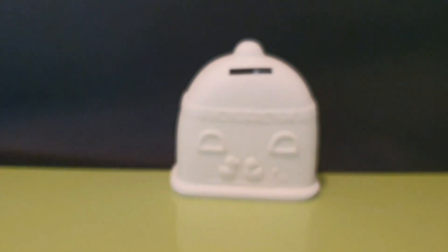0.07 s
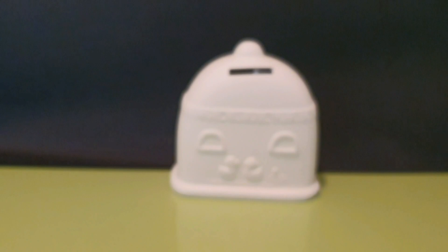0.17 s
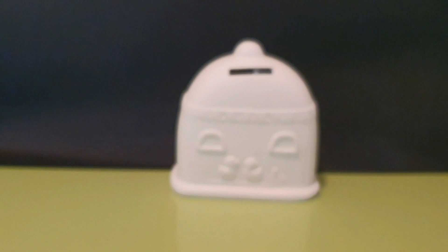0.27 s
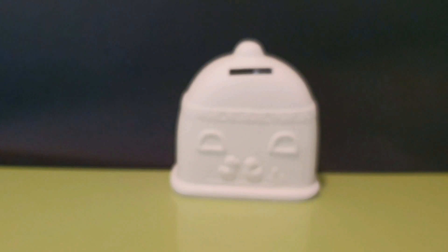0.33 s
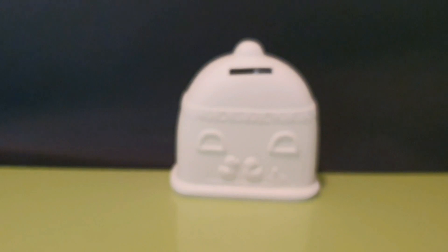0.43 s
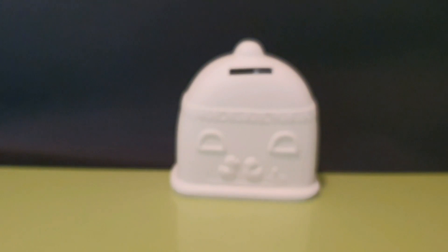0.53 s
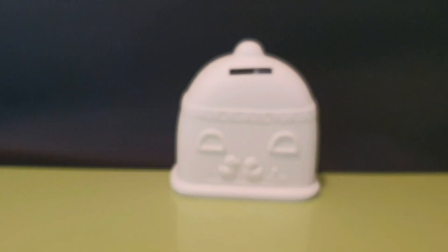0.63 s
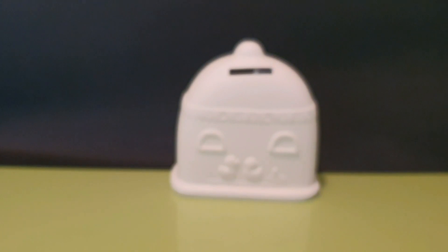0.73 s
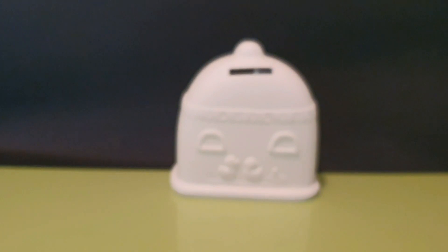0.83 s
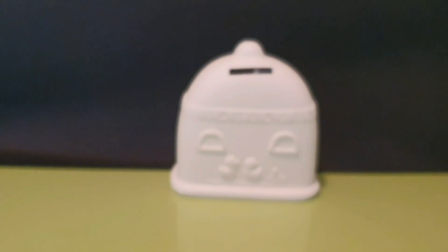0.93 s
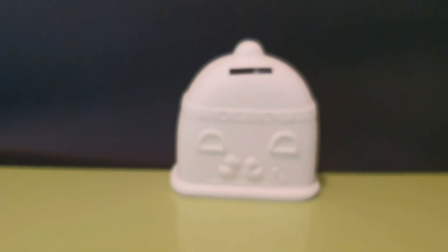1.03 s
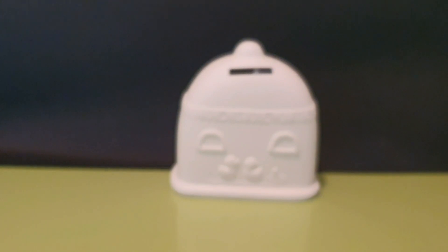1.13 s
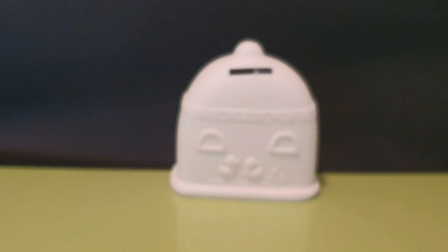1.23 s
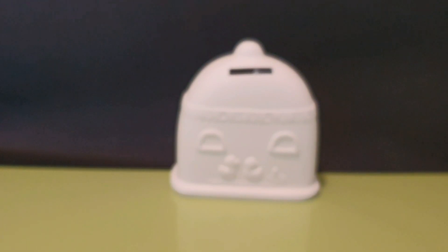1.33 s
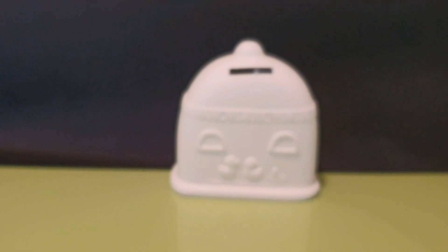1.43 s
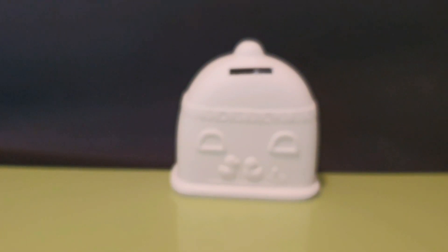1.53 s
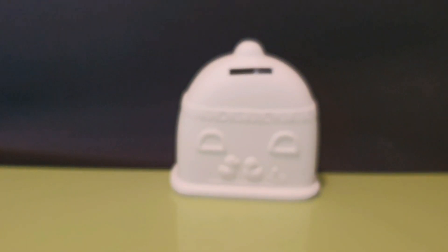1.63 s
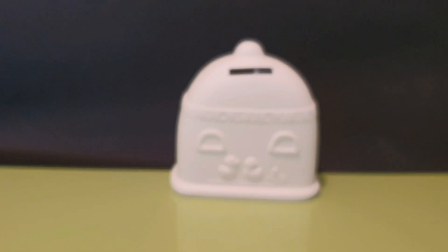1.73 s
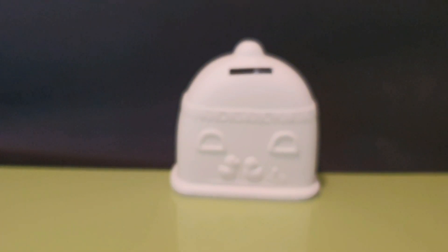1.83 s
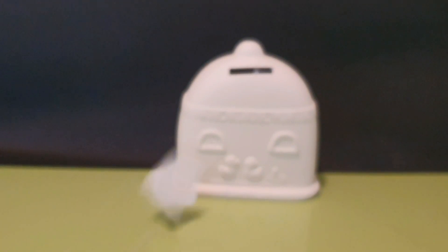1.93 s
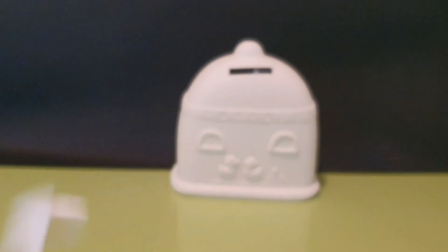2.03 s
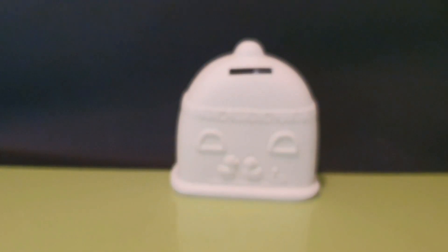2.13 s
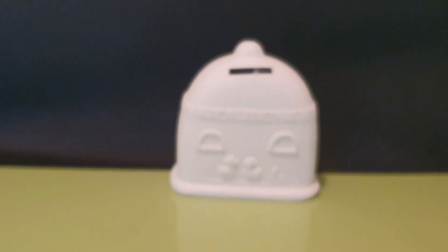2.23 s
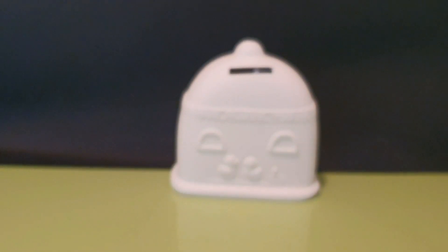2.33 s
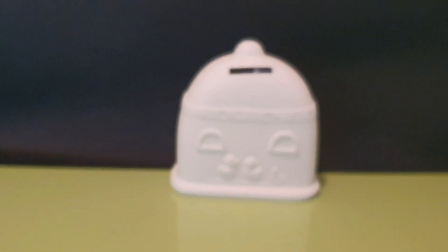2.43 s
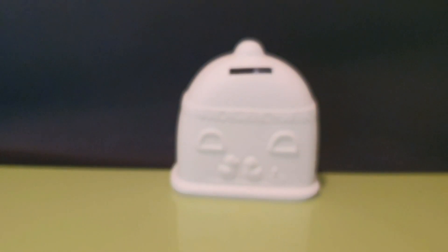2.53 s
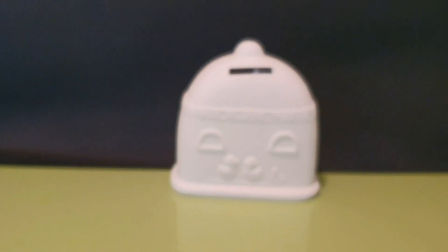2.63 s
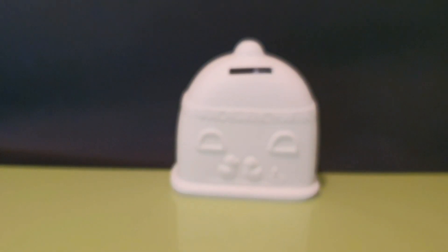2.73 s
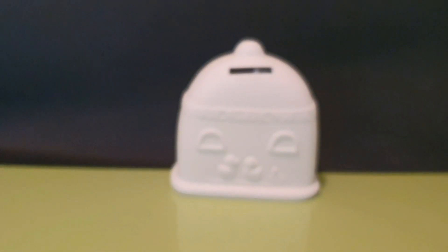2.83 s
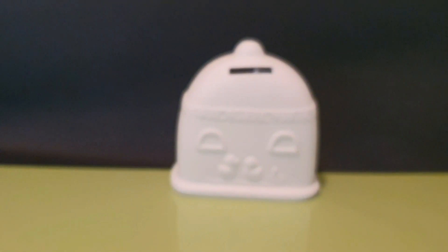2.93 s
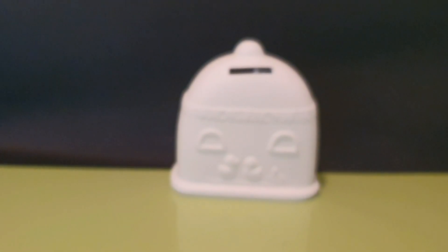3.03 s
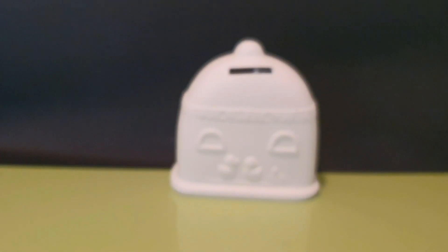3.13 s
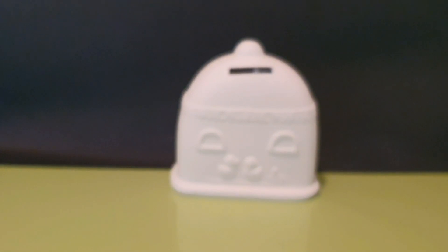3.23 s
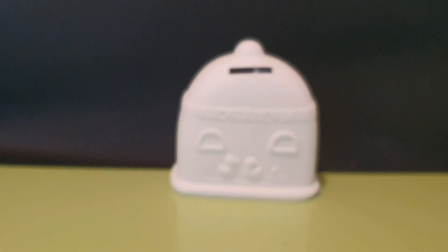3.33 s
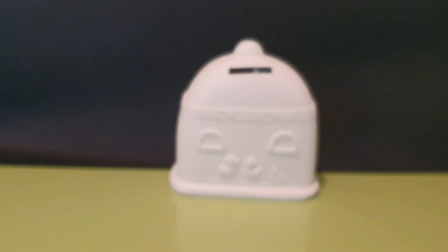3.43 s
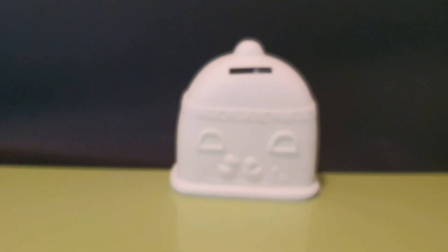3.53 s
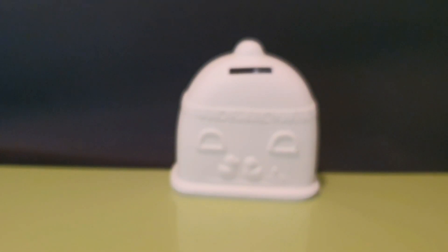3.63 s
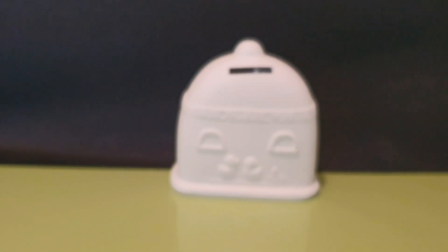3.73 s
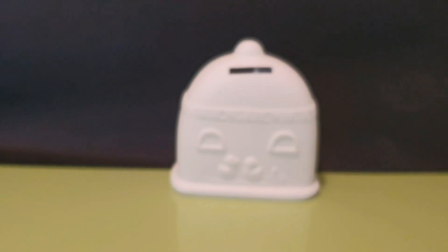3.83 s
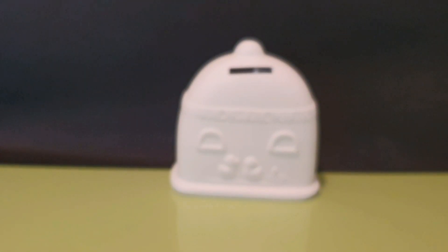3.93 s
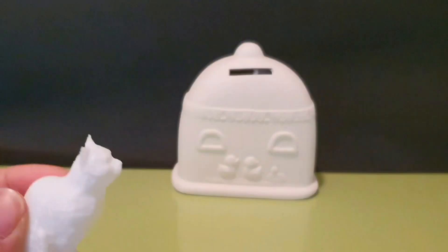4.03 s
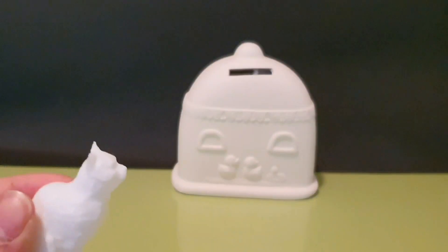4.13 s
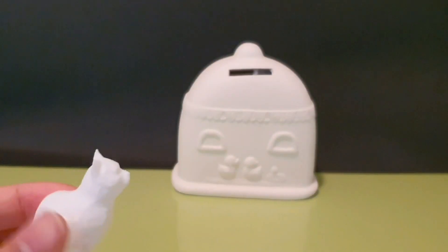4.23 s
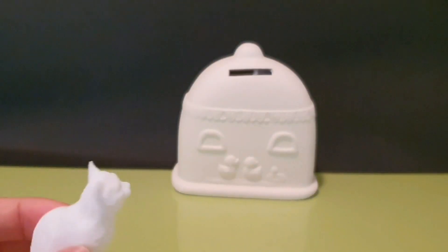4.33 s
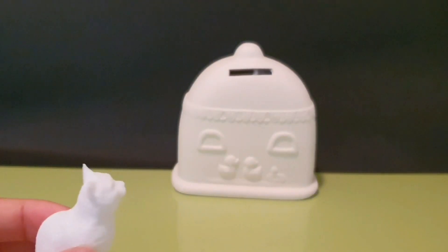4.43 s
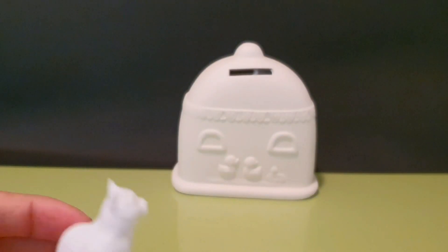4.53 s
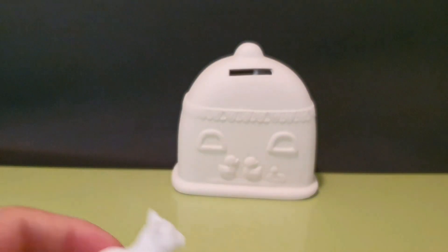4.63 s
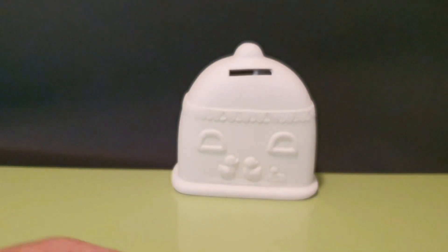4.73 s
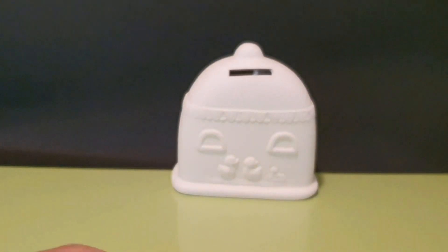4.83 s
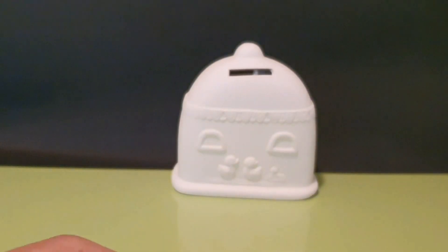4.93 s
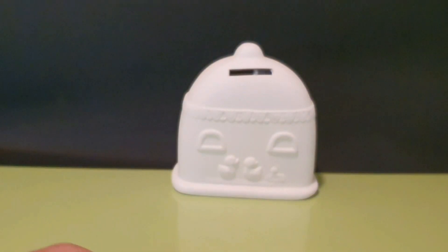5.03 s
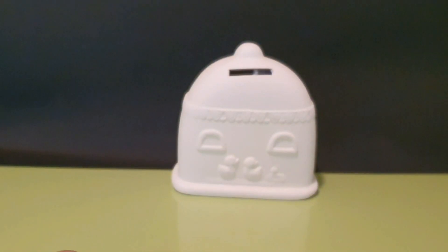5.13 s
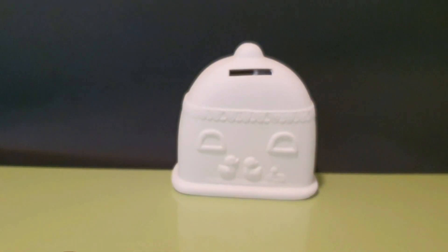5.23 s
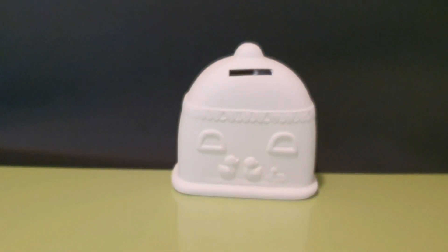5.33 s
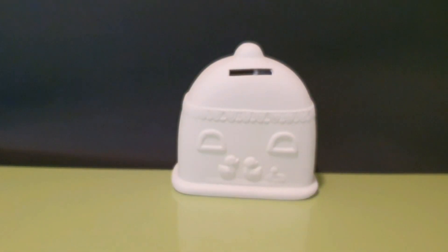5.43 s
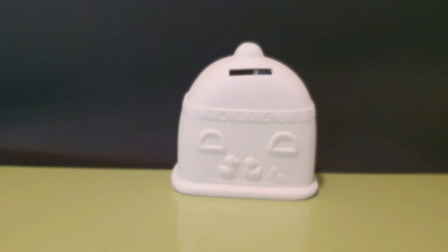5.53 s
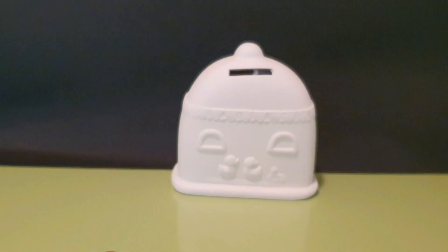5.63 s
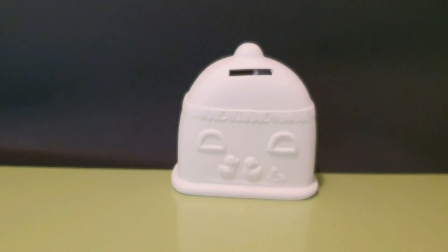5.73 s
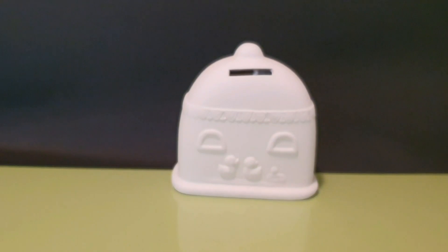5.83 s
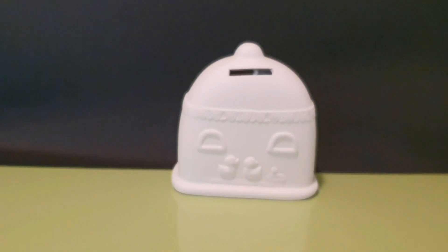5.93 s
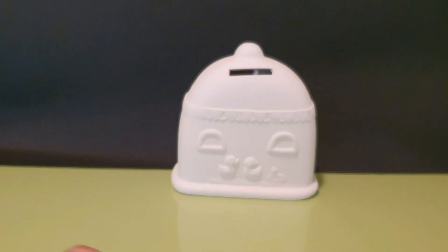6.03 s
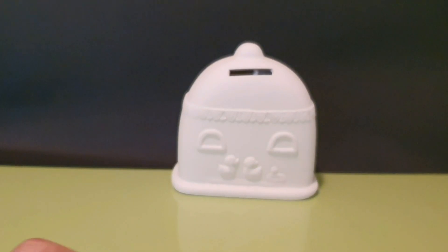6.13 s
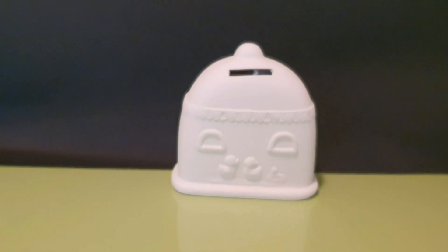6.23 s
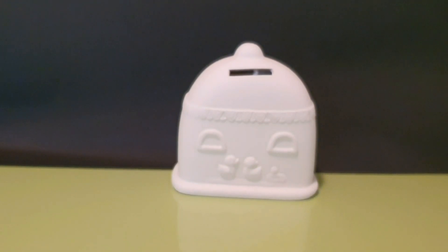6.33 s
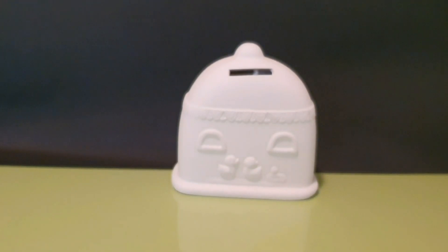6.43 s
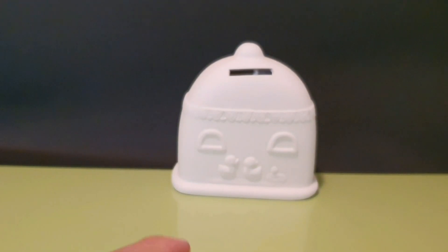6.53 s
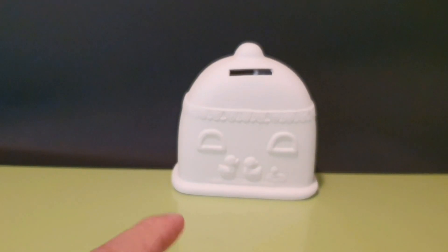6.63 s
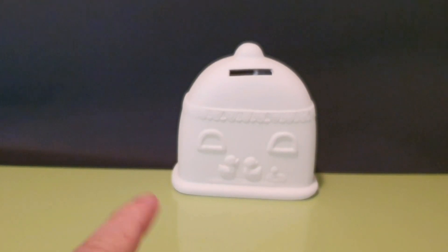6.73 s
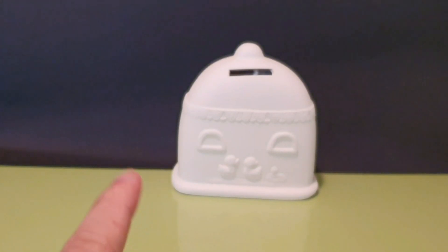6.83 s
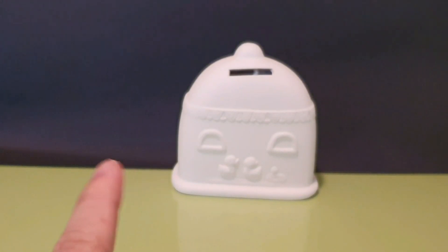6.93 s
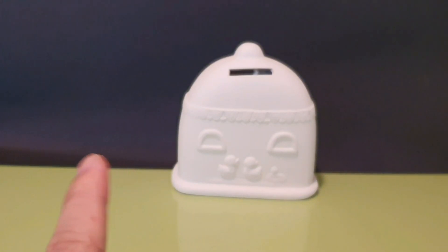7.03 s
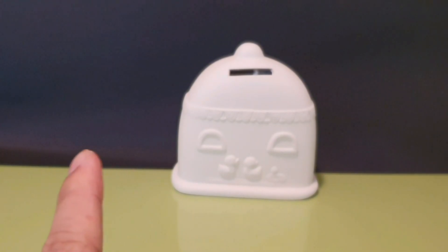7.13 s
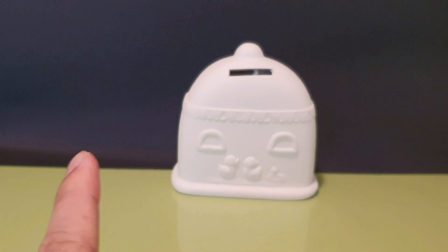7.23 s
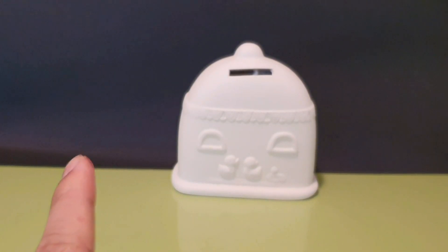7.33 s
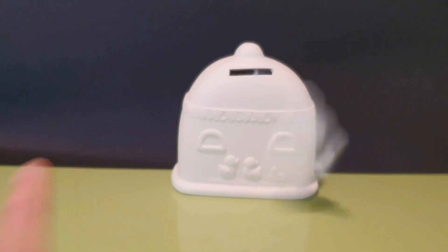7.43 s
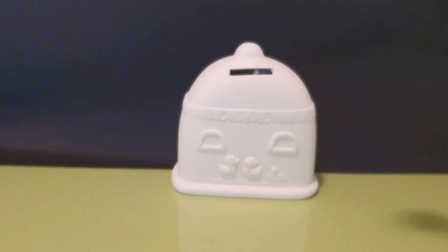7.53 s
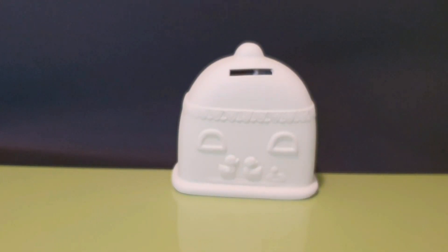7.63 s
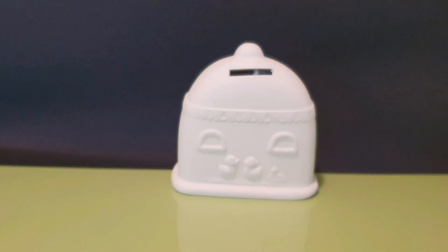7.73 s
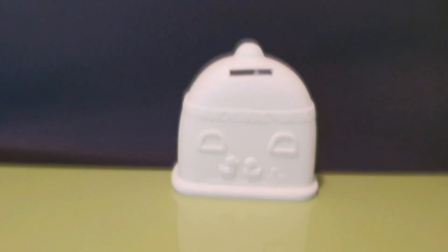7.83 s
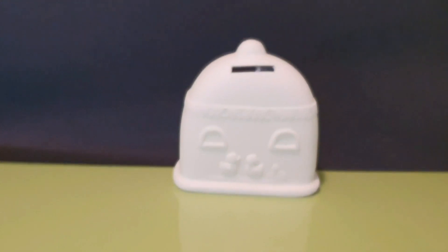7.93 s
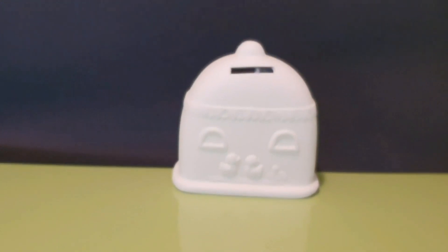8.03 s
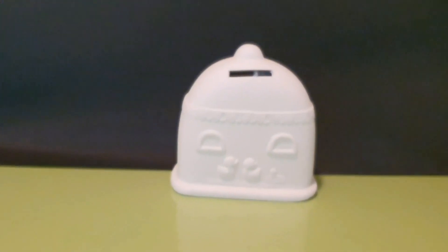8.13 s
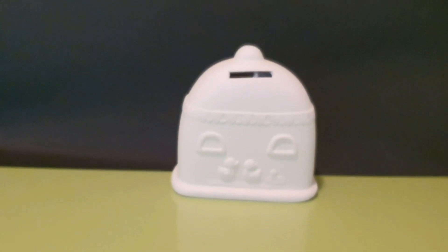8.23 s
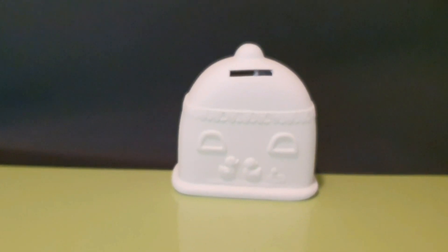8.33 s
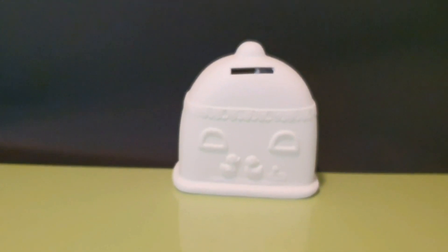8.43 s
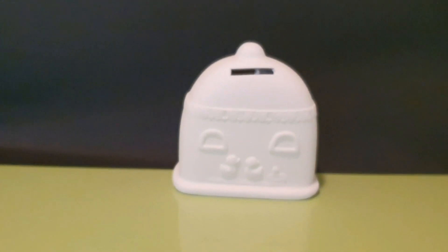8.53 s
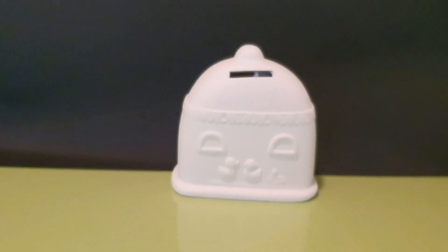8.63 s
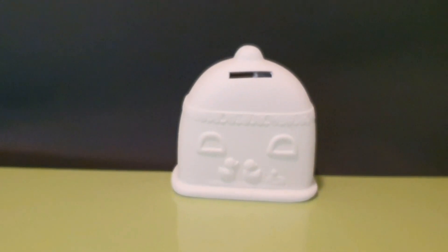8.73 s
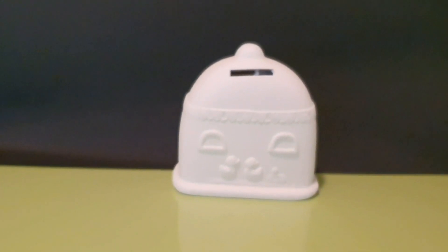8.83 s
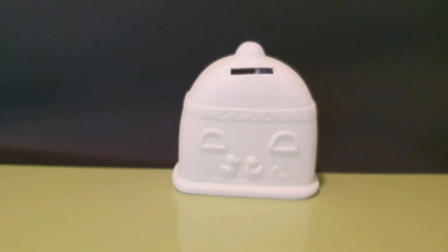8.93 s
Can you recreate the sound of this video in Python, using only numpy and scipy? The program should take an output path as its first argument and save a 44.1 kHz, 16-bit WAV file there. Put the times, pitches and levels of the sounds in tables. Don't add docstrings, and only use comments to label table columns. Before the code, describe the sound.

Hollow plaster figures tick, bounce and clatter on a tabletop in a quiet small room, over faint fan hum and hiss.

```python
import sys
import numpy as np
from scipy import signal
from scipy.fft import rfft, irfft
from scipy.io import wavfile
from scipy.ndimage import uniform_filter1d

SR = 44100
rng = np.random.default_rng(int(sys.argv[2]) if len(sys.argv) > 2 else 0)


def gain_from_decibels(decibels):
    exponent = np.asarray(decibels, float) / 20
    return 10 ** exponent


def digitize_waveform(pressure):
    field = np.atleast_2d(pressure).T
    bounded = np.clip(field, -1, 1)
    quanta = np.round(bounded * 32767).astype(np.int16)
    wavfile.write(sys.argv[1], SR, quanta)


N = 395577


def rms_one(x):
    return x / np.sqrt(np.mean(x ** 2) + 1e-20)


def band(x, low_hz, high_hz, order=2):
    edges = [low_hz, min(high_hz, .45 * SR)]
    return signal.sosfilt(signal.butter(order, edges, "band", fs=SR, output="sos"), x)


def at_hz(points, hz):
    f, value = np.transpose(points)
    return np.interp(np.log(hz), np.log(f), value)


def swell(t, rise_s, start, hold, db, fall):
    rise = np.clip((t - start) / rise_s, 0, 1)
    return rise * gain_from_decibels(db - fall * np.maximum(t - start - rise_s - hold, 0))


def swells(rows, rise_s, more_db):
    coarse = np.arange(0, N, 64) / SR
    power = 0
    for row, db in zip(rows, np.broadcast_to(more_db, len(rows))):
        power = power + (swell(coarse, rise_s, *row[:4]) * gain_from_decibels(db)) ** 2
    return np.interp(np.arange(N) / SR, coarse, np.sqrt(power))


def peaks(x, rows):
    for hz, width, db in rows:
        w, lift = 2 * np.pi * hz / SR, gain_from_decibels(db / 2)
        spread = np.sin(w) * width / hz / 2
        top = [1 + spread * lift, -2 * np.cos(w), 1 - spread * lift]
        bottom = [1 + spread / lift, -2 * np.cos(w), 1 - spread / lift]
        x = signal.lfilter(top, bottom, x)
    return x


def ring(clicks, hz, t60):
    r, w = np.exp(-np.log(1000) / (t60 * SR)), 2 * np.pi * hz / SR
    return signal.lfilter([0, np.sin(w)], [1, -2 * r * np.cos(w), r * r], clicks + 1e-18)


# (f/Hz, likeness 0-1)
LEFT_RIGHT_LIKENESS = [(30, 0.95), (120, 1), (550, 0.16), (1650, 0), (5000, 0.068), (15000, 0)]


def coloured(spectrum, flicker_db):
    hz = np.maximum(np.arange(N // 2 + 1) * SR / N, 1)
    alike = np.clip(at_hz(LEFT_RIGHT_LIKENESS, hz), -.2, 1)
    mid, side = rfft(rng.standard_normal((2, N)))
    inside = (hz > spectrum[0][0]) * gain_from_decibels(at_hz(spectrum, hz))
    pair = inside * (np.sqrt(1 + alike) * mid + np.sqrt(1 - alike) * side * [[1], [-1]])
    flicker = np.interp(np.arange(N), np.linspace(0, N, 70), rng.standard_normal(70))
    return rms_one(irfft(pair, N)) * gain_from_decibels(flicker_db * flicker)


# (f/Hz, level/dB per Hz)
RUMBLE_COLOUR = [(12, -31.5), (20, 3), (40, 1), (92, -19.5), (124, -13.5), (195, -22), (300, -41.5),
                 (660, -120)]
# (f/Hz, level/dB per Hz)
HISS_COLOUR = [(200, -22.5), (480, 4), (2000, -4), (3200, -9), (9000, -22), (12500, -14.5), (15800, -10),
               (16200, -44)]
# (f/Hz, width/Hz, level/dB in the rumble)
FAN_HUMS = [(58, 7, -2), (135, 7, -3), (188, 2.5, -3)]
# (t/s, level/dB)
GAIN = [(0, 2), (1.97, -3), (2.1, -16), (2.35, -5.5), (2.7, -13.5), (3.99, -13.5), (4.03, -10.5),
        (4.5, -13.5), (8.97, -15.5)]
# (start t/s, hold/s, level/dB, fall/dB per s)
SHAKES = [
    (.41, 0.056, -49, 10.5),
    (1.55, .25, -50, 61),
    (5.25, .15, -64, 41),
    (5.681, 0.045, -64.5, 13),
    (6.51, 0.073, -67.5, 11.5),
    (7.151, .11, -68.5, 41),
    (7.451, 0.031, -44.5, 105),
]
# (from t/s, to t/s)
SCENE_CHANGE = (3.994, 4.024)


def room_tone():
    rumble_db, hiss_db, later_hiss_db = -53, -60.5, 1.5
    t = np.arange(N) / SR
    white = rng.standard_normal((2, N))
    white = white[0] + 0.25 * white[1] * [[1], [-1]]
    hums = 0
    for hz, width, db in FAN_HUMS:
        hums = hums + gain_from_decibels(db) * rms_one(band(white, hz - width / 2, hz + width / 2, order=1))
    rumble = rms_one(coloured(RUMBLE_COLOUR, flicker_db=1.5) + hums)
    gain_db = np.interp(t, *np.transpose(GAIN))
    rumble_level = np.hypot(gain_from_decibels(rumble_db + gain_db), swells(SHAKES, 0.05, 0))
    hiss_level = gain_from_decibels(hiss_db + gain_db + later_hiss_db * (t > SCENE_CHANGE[0]))
    return rumble_level * rumble + hiss_level * coloured(HISS_COLOUR, flicker_db=1.0)


# (start t/s, hold/s, level/dB, fall/dB per s)
HAND = [
    (3.49, 0.019, -75.5, 88.5),
    (4.0, 0.0091, -65, 82),
    (4.26, .04, -71, 50),
    (4.6, 0.22, -70, 84.5),
    (5.0, 0.069, -72.5, 196.5),
]
# (start t/s, hold/s, level/dB, fall/dB per s)
RUBBING = [
    (.39, 0.35, -65.5, 166),
    (.67, 0.082, -63, 200),
    (1.0, 0.16, -72, 300),
    (1.95, .015, -58, 904.5),
    (5.70, 0.039, -59, 900),
]
# (from t/s, to t/s, f/Hz, level/dB)
WHISTLES = [(6.5, 6.6, 4270, -78), (6.51, 6.58, 3760, -79), (6.734, 6.952, 4470, -86),
            (7.015, 7.06, 4250, -82), (7.05, 7.17, 4590, -87)]


def faint_moves():
    rise_s = 0.021
    t, white = np.arange(N) / SR, rng.standard_normal((2, N))
    out = swells(HAND, rise_s, 0) * rms_one(band(white, 1770, 3100))
    out += swells(RUBBING, rise_s, 0) * rms_one(band(white, 5500, 20000))
    for start, end, hz, db in WHISTLES:
        shape = np.sin(np.pi * np.clip((t - start) / (end - start), 0, 1)) ** .5
        out += gain_from_decibels(db) * shape * rms_one(band(white[0], hz - 12, hz + 12, order=1))
    return out


# (start t/s, hold/s, dull level/dB, fall/dB per s, bright level/dB relative to dull)
SLEEVE = [
    (7.505, 0.011, -49.5, 16.5, -10.5),
    (7.823, 0.027, -46.5, 124.5, -0.5),
    (8.127, 0.15, -56, 84.5, -13),
    (8.326, 0.13, -53.5, 98, -1),
    (8.548, 0.14, -68, 57, 3.5),
    (8.773, 0.042, -58.5, 80, -6),
]


def sleeve():
    rise_s = 0.06
    dull = swells(SLEEVE, rise_s, 0)
    bright = swells(SLEEVE, rise_s, [row[-1] for row in SLEEVE])
    white = rng.standard_normal((3, N))
    white = 0.5 * white[0] + 0.94 * white[1:]
    dull_cloth = rms_one(band(white, 130, 1700, order=1))
    return dull * dull_cloth + bright * rms_one(band(white, 1500, 15600, order=1))


# (t/s, peak level/dB, f/Hz, t60/s)
THUMPS = [(1.9881, -27.5, 58, 0.15), (2.061, -46, 51, 0.12), (2.471, -47, 321, .081),
          (4.721, -61, 106, .31), (4.981, -61, 111, .21), (5.66, -49.5, 66, .9), (6.101, -50, 166, .31),
          (6.345, -57, 681, .07), (6.631, -61, 171, .31), (7.4441, -30, 68, 0.19),
          (7.4957, -8.5, 1240, .0071), (7.501, -45, 47, 0.12), (7.8606, -21.5, 561, .021),
          (7.9131, -37, 63, 0.15), (7.9153, -20, 350, .013), (7.9135, -17, 1150, .009)]


def thumps():
    lead_radians = .8
    out, t = np.zeros((2, N)), np.arange(SR // 2) / SR
    for s, db, hz, t60 in THUMPS:
        at = round(s * SR)
        wave = np.sin(2 * np.pi * hz * t + lead_radians * np.array([[.5], [-.5]]))
        out[:, at:at + len(t)] += gain_from_decibels(db) * wave * np.minimum(t * hz * 2, 1) * 1000. ** (-t / t60)
    return out


# (t/s, f/Hz, level/dB, t60/s)
CUT_RING = (4.026, 3400, -61, .36)


def cut_ring():
    s, hz, db, t60 = CUT_RING
    click = np.zeros(N)
    click[round(s * SR)] = gain_from_decibels(db)
    return ring(click, hz, t60) + ring(click, hz + 38, t60) + ring(click, hz - 55, t60) / 2


# (f/Hz, level/dB, t60/s)
TABLE_TOP = [(330, -4, .12), (520, -5, .08), (828, 0, .12), (1100, -4, .09), (1300, -5, .09),
             (1950, -3, .08), (3740, -15, .07), (4280, -17, .11), (5800, -17, .06)]


def slides(table, piece_modes, rasp_hz, grains_per_s, body_db, piece_db, colour=()):
    rise_s = 0.0037
    out = np.zeros((2, N))
    for s, hold, grind_db, fall, rasp_db in table:
        t = np.arange(SR // 2)[:round((rise_s + hold + 36 / fall) * SR)] / SR
        chance, size = rng.random((2, 3, SR // 2))[..., :len(t)]
        heights = gain_from_decibels(-4.5 * np.log(np.maximum(size, .03)))
        grains = (chance < grains_per_s / SR) * heights * np.sign(chance * SR % 1 - .5)
        grains = 0.74 * grains[0] + 0.76 * grains[1:]
        body = sum(gain_from_decibels(db) * ring(grains, hz, 1.2 * t60) for hz, db, t60 in TABLE_TOP[:6])
        piece = sum(gain_from_decibels(db) * ring(grains, hz, 1.2 * t60) for hz, db, t60 in piece_modes)
        scrape = rms_one(band(band(grains, 250, 2100), 100, 2200, order=5))
        grind = rms_one(scrape + gain_from_decibels(body_db) * rms_one(body))
        rasp = rms_one(band(grains, rasp_hz, 13000, order=5))
        rasp = rms_one(rasp + gain_from_decibels(piece_db) * rms_one(piece))
        gain = swell(t, rise_s, 0, hold, grind_db - 3.0, fall)
        out[:, round(s * SR):][:, :len(t)] += gain * peaks(grind + gain_from_decibels(rasp_db) * rasp, colour)
    return out


# (start t/s, hold/s, grind level/dB, fall/dB per s, rasp level/dB relative to grind)
SLIDES = [
    (2.255, 0.0055, -45.5, 260, -13),
    (2.345, 0.0083, -45.5, 178, -3.5),
    (2.441, 0.054, -53.5, 365.5, -8),
    (4.708, 0.028, -69.5, 106.5, -5),
    (5.628, 0.0029, -50, 647.5, -16),
    (6.024, .12, -37, 341.5, -11),
    (6.191, 0.019, -41, 288, -18),
    (6.464, 0.0019, -50.5, 898, -19),
    (6.501, 0.019, -46.5, 322, -18.5),
    (7.014, 0.011, -56.5, 264, -16),
]
# (f/Hz, width/Hz, level/dB)
SLIDE_COLOUR = [(2950, 800, -12), (1950, 400, 3)]


def table_slides():
    return slides(SLIDES, TABLE_TOP[6:], rasp_hz=3560, grains_per_s=1800, body_db=2.5, piece_db=-1.5,
                  colour=SLIDE_COLOUR)


def contacts(table, modes, pan_db, alike, knock_hz, edge_hz, bright_hz, kind_thud_db, kind_edge_db, ring_db,
             colour=()):
    rise_share, thud_loss = .2, 0.63
    beat_depth, ring_flutter_db = .45, 3.5
    out, t = np.zeros((2, N)), np.arange(SR // 4) / SR
    short = t[:SR // 12]
    rattle = rng.standard_normal((len(table), 3, len(short)))
    chance = rng.random((len(table), len(modes), 27))
    alike = np.clip(alike, 0, 1)
    for (s, db, hard_db, length_ms), noise, luck in zip(table, rattle, chance):
        thud_db, edge_db = kind_thud_db - thud_loss * hard_db, kind_edge_db + hard_db
        pair = np.sqrt(alike) * noise[0] + np.sqrt(1 - alike) * noise[1:]
        rise = np.minimum(short / (length_ms * rise_share / 1000), 1)
        force = pair * rise * np.exp(-short / (max(length_ms, .3) / 3000))
        force[:, 4] += 95.0 / max(length_ms, 2) ** 2
        thud = band(force, 150, 700)
        knock = band(force, 700, knock_hz, order=3)
        edge = band(band(force, edge_hz, 16300), 500, bright_hz, order=1)
        crack = knock / knock.std() + gain_from_decibels(thud_db) * thud / thud.std() + gain_from_decibels(edge_db) * edge / edge.std()
        crack = peaks(crack, colour) * knock.std() / np.abs(knock).max()
        hit = np.pad(crack, ((0, 0), (0, len(t) - len(short))))
        for (hz, mode_db, t60), (strength, turn, split, *wobble) in zip(modes, luck):
            share_db = np.interp(np.log(hz), np.log([450, 1400, 3500]), [thud_db, 0, edge_db])
            share_db += 6 * strength - 3
            lag = .7 * np.pi * (1 - alike) * turn * np.array([[0], [1]])
            beat = 1 + beat_depth * np.cos(2 * np.pi * (.01 * hz * (split + .5) * t + turn))
            flutter = np.interp(t, np.linspace(0, t[-1], len(wobble)), 3.5 * np.array(wobble) - 1.75)
            beat *= gain_from_decibels(ring_flutter_db * flutter)
            fade = np.minimum(t / 0.00061, 1) * 1000. ** (-t / t60)
            hit += gain_from_decibels(ring_db + mode_db + share_db) * beat * np.sin(2 * np.pi * hz * t + lag) * fade
        at = round(s * SR)
        ear_gain = gain_from_decibels(db + np.array([[pan_db], [-pan_db]]) / 2)
        out[:, at:at + len(t)] += ear_gain * hit * np.cos(t / t[-1] * np.pi / 2)
    return out


# (f/Hz, width/Hz, level/dB)
FINGERING = [
    (0.3795, -48, 1.5, 17),
    (0.7646, -54.5, -1.5, 13),
    (1.1333, -58, -3, 9),
]
FLICK = [
    (0.5118, -45, 1, 14),
]
SMALL_PIECE = [(335, 21, 0.08), (7130, 2, 0.028), (9100, 6, .015), (8000, -3, .03), (6500, -3, .04),
               (4040, 12, 0.01)]


def fingering():
    touches = contacts(FINGERING, SMALL_PIECE[:4], pan_db=2.5, alike=0.15, knock_hz=2500, edge_hz=5300,
                       bright_hz=16200, kind_thud_db=-13, kind_edge_db=9.0, ring_db=-4)
    return touches + contacts(FLICK, SMALL_PIECE, pan_db=2, alike=0.25, knock_hz=2480, edge_hz=7900,
                              bright_hz=16200, kind_thud_db=-8.5, kind_edge_db=12, ring_db=-10.0)


TICKS = [
    (2.3656, -41, -9, 15),
    (2.422, -44, -4.5, 13),
    (2.6265, -61, 8, 9),
    (4.3695, -69, 5.5, 11),
    (5.0295, -67.5, 1.5, 55),
    (5.3995, -72, -3.5, 17),
    (5.7325, -73, 8.5, 44),
]
BRIGHT_TICKS = [
    (2.4166, -52, 3.5, 11),
    (2.4494, -50.5, 6, 9),
    (2.4699, -46, -5.5, 12),
]
SOFT_TOUCH = [
    (4.6761, -54, 0.6, 24),
    (4.721, -58, 0, 26),
    (4.801, -62, 6, 16),
]
HOLLOW = [(500, 0, .25), (1650, -12, .1)]


def ticks_and_touches():
    out = contacts(TICKS, HOLLOW, pan_db=3.5, alike=0.14, knock_hz=2280, edge_hz=3400, bright_hz=9000,
                   kind_thud_db=-15, kind_edge_db=11.5, ring_db=-26)
    out += contacts(BRIGHT_TICKS, HOLLOW, pan_db=6.0, alike=0.14, knock_hz=2370, edge_hz=6300,
                    bright_hz=10000, kind_thud_db=-18, kind_edge_db=13, ring_db=-26)
    return out + contacts(SOFT_TOUCH, HOLLOW, pan_db=2.5, alike=0.22, knock_hz=1190, edge_hz=830,
                          bright_hz=4970, kind_thud_db=1.5, kind_edge_db=-5.0, ring_db=0.5)


KNOCK = [
    (5.125, -48, 11, 20),
    (5.14, -28, 0, 13.5),
    (5.155, -33.5, -6, 17.6),
    (5.174, -44.5, -1, 46),
    (6.31, -54.5, 2.5, 16.5),
    (6.343, -51, 2, 13),
    (6.78, -61.5, -4, 33),
    (6.99, -56.5, -1, 24),
    (7.0231, -45.5, 4, 16),
]
KNOCK_COLOUR = [(1310, 330, -5.5), (1940, 150, 15), (3600, 630, -2)]
SOFT_KNOCK_TABLE = [(600, -2, .08), (830, 0, .15), (1000, -3, .06), (1290, 0, .16), (1950, -6, .06)]


def knocks():
    firm = contacts(KNOCK[:6], TABLE_TOP[:4], pan_db=2.5, alike=0.47, knock_hz=1054, edge_hz=2900,
                    bright_hz=6010, kind_thud_db=-4.0, kind_edge_db=-15.0, ring_db=-8.5, colour=KNOCK_COLOUR)
    return firm + contacts(KNOCK[6:], SOFT_KNOCK_TABLE, pan_db=1.5, alike=0.36, knock_hz=1340, edge_hz=3200,
                           bright_hz=6000, kind_thud_db=-0.5, kind_edge_db=-21.0, ring_db=-9.5)


ROLL = [
    (2.2545, -22.5, -2.5, 21),
    (2.269, -27, -3, 20),
    (2.281, -39, 0, 51),
    (2.3505, -31, -9, 14),
    (2.366, -33, -9, 41),
    (5.7758, -16.5, 8, 8.4),
    (5.7805, -19.5, 5, 14),
    (5.7855, -19, 2.5, 13.7),
    (5.793, -20.5, -2, 38),
]
ROLL_COLOUR = [(1260, 350, -1), (1800, 500, 4.5), (3380, 890, 1.5)]
TUMBLE_COLOUR = [(1710, 520, 3.5), (4230, 620, 10), (4900, 420, -15)]


def rolls():
    roll = contacts(ROLL[:5], TABLE_TOP[:6], pan_db=0.16, alike=0.27, knock_hz=2560, edge_hz=4700,
                    bright_hz=6900, kind_thud_db=-12.5, kind_edge_db=-13.5, ring_db=-16.0, colour=ROLL_COLOUR)
    return roll + contacts(ROLL[5:], TABLE_TOP, pan_db=1.0, alike=0.32, knock_hz=2460, edge_hz=2700,
                           bright_hz=6900, kind_thud_db=-11.5, kind_edge_db=-9.5, ring_db=-18.0,
                           colour=TUMBLE_COLOUR)


SET_DOWN = [(5.62, -46.5, -15.5, 9.4), (6.009, -47, -12, 30), (6.0175, -30, 12, 12), (6.032, -26.5, 8, 23),
            (6.047, -25, 2, 11.6), (6.057, -29, -2, 17), (6.1051, -31, 0, 22), (6.135, -33, 6, 18),
            (6.1931, -40, -3, 26), (6.232, -39.5, -11, 8.2), (6.274, -49, -11, 14), (6.469, -55, -9, 18),
            (6.509, -48.5, -17, 17)]
SET_DOWN_COLOUR = [(2920, 960, -8.5), (1900, 400, -0.5), (3700, 360, 11)]


def set_down():
    return contacts(SET_DOWN, TABLE_TOP, pan_db=0.5, alike=0.33, knock_hz=2060, edge_hz=4200, bright_hz=8950,
                    kind_thud_db=-9.5, kind_edge_db=-12.0, ring_db=-9.0, colour=SET_DOWN_COLOUR)


LANDING = [
    (1.9874, -17, 8, 13.4),
    (2.002, -19, -5, 18),
    (2.012, -25.5, 0.5, 17),
    (2.472, -48, -22, 9.8),
    (7.4442, -23.5, 2, 13),
    (7.451, -31.5, 6, 9.3),
    (7.759, -50, 5, 6.9),
]
LANDING_TABLE = [(328, -4, .15), (520, -5, .08), (840, 1, .14), (1104, -8, .08), (1500, -8, .05),
                 (2234, -14, .06)]
LANDING_COLOUR = [(296, 200, -4.5), (3970, 3300, -10), (7340, 750, 4.5)]
SECOND_LANDING_COLOUR = [(300, 200, 3), (900, 510, -6), (2620, 900, -3)]


def landings():
    first = contacts(LANDING[:4], LANDING_TABLE, pan_db=-1.04, alike=0.2, knock_hz=900, edge_hz=1800,
                     bright_hz=14000, kind_thud_db=-4.0, kind_edge_db=0.5, ring_db=-9.5, colour=LANDING_COLOUR)
    return first + contacts(LANDING[4:], TABLE_TOP[:6], pan_db=1.3, alike=0.35, knock_hz=900, edge_hz=1800,
                            bright_hz=14000, kind_thud_db=-3, kind_edge_db=-1.0, ring_db=-14.5,
                            colour=SECOND_LANDING_COLOUR)


TIPPING = [
    (7.8568, -23, 7.5, 10.5),
    (8.199, -45.5, -13, 25),
    (8.228, -36.5, -1, 13),
]
TIPPING_PIECE = [(580, 3, .03), (2030, -8, .04), (2450, -10, .04), (3765, -14, .12), (4345, -8, .03)]
TIPPING_COLOUR = [(277, 190, -7.5), (2800, 720, 3), (4250, 500, 13.5), (10100, 3000, -5.5)]


def tipping():
    return contacts(TIPPING, TIPPING_PIECE, pan_db=-3.5, alike=0.22, knock_hz=2400, edge_hz=1200,
                    bright_hz=8950, kind_thud_db=1.5, kind_edge_db=-4.5, ring_db=-10, colour=TIPPING_COLOUR)


BOUNCE = [
    (2.0387, -24, 6.5, 11),
    (2.0492, -22, 5.5, 12),
    (2.0574, -4.5, -2, 5.5),
    (2.072, -18.5, -0.5, 2.4),
    (2.083, -19.5, 0.5, 4),
    (2.094, -22.5, 0, 6.7),
    (2.114, -17.5, -0.5, 7.5),
]
BOUNCING_PIECE = [(1612, -5, .11), (2735, -13, .1), (2785, -7, .16), (2990, -19, .12), (3925, -15, .35),
                  (4581, -18, .12), (4856, -22, .15), (5437, -19, .2), (5911, -24, .2), (7111, -16, .22),
                  (474, -10, .15)]
BOUNCE_COLOUR = [(800, 1200, -9.5), (1730, 460, 6), (5017, 2000, 2)]
# (start t/s, hold/s, grind level/dB, fall/dB per s, rasp level/dB relative to grind)
BOUNCE_SKIDS = [
    (2.018, 0.015, -32, 603.4, -4.5),
    (2.035, 0.013, -30, 601.3, 7),
    (2.046, 0.008, -32, 600, 8.5),
    (2.077, .006, -34.5, 193.3, 7),
]


def bounce():
    hits = contacts(BOUNCE, BOUNCING_PIECE, pan_db=2.0, alike=.35, knock_hz=2590, edge_hz=3000, bright_hz=8000,
                    kind_thud_db=-17.5, kind_edge_db=-4.0, ring_db=-10.0, colour=BOUNCE_COLOUR)
    return hits + slides(BOUNCE_SKIDS, BOUNCING_PIECE[1:7], rasp_hz=2220, grains_per_s=2500, body_db=-1.5,
                         piece_db=3.0)


DROP = [
    (7.4959, -14.5, -13.5, 3.7),
    (7.4994, -1.5, -9, 2.5),
    (7.5012, -8.5, 6, 12),
    (7.511, -19.5, 5, 16),
    (7.545, -20, 1.5, 14),
]
DROPPED_PIECE = [(330, -10, .2), (465, -12, .09), (743, -2, .17), (1050, -6, .1), (1250, -3, .05),
                 (1572, -8, .12), (2020, 4, .2), (2982, -5, .12), (3730, -6, .3), (4021, -12, .15),
                 (4350, 1, .045), (5766, -15, .08)]
DROP_COLOUR = [(300, 230, -6), (1300, 300, 1), (4336, 600, 8)]
# (start t/s, hold/s, grind level/dB, fall/dB per s, rasp level/dB relative to grind)
DROP_SKIDS = [
    (7.458, 0.025, -32.5, 900, 0.004),
    (7.482, 0.0058, -32, 892, 0),
]
SKID_COLOUR = [(850, 430, -9), (300, 170, 3)]


def drop():
    hits = contacts(DROP, DROPPED_PIECE, pan_db=1.9, alike=0.19, knock_hz=3170, edge_hz=4900, bright_hz=9000,
                    kind_thud_db=-9, kind_edge_db=-4.0, ring_db=-20.5, colour=DROP_COLOUR)
    return hits + slides(DROP_SKIDS, TABLE_TOP[6:], rasp_hz=2440, grains_per_s=2300, body_db=-4, piece_db=-9,
                         colour=SKID_COLOUR)


REBOUND = [
    (7.8906, -21, -1.5, 12),
    (7.9123, -10, 2, 5),
    (7.9148, -13, 0, 9),
    (7.921, -21, 0, 14),
    (7.930, -26, 0, 14),
    (7.9954, -21.5, -2.5, 5.5),
]
REBOUNDING_PIECE = [(300, -10, .03), (1200, -2, .04), (1642, -10, .08), (2333, -10, .1), (2750, -8, .03),
                    (3755, -9, .2), (4345, -8, .24), (4651, -15, .08), (5265, -14, .1), (5512, -13, .1),
                    (5800, -8, .05), (6900, -9, .05)]
REBOUND_COLOUR = [(1320, 420, -5), (13000, 3000, 5), (3813, 500, 3.5), (4390, 320, 6), (4840, 500, -2.5)]


def rebound():
    return contacts(REBOUND, REBOUNDING_PIECE, pan_db=-7.5, alike=0.44, knock_hz=2271, edge_hz=2000,
                    bright_hz=11750, kind_thud_db=-6.5, kind_edge_db=-4.0, ring_db=-19.0, colour=REBOUND_COLOUR)


# (from f/Hz, to f/Hz, t60/s, level/dB)
ROOM = [(147.25, 870, 0.29, -4), (847, 1860, 0.26, -6.5), (2500, 8000, 0.3, -4.5),
        (9300, 24000, 0.24, -5.5)]


def room(x):
    t = np.arange(SR // 2) / SR
    white = rng.standard_normal((3, len(t)))
    white = 0.28 * white[0] + white[1:]
    rise = np.clip((t - .002) / 0.0061, 0, 1)
    tail = sum(gain_from_decibels(db - 24.0) * band(white, low, high) * 1000. ** (-t / t60) for low, high, t60, db in ROOM)
    return signal.fftconvolve(x[None], rise * tail, axes=1)[:, :N]


# (f/Hz, width/Hz, level/dB)
MICROPHONE_COLOUR = [(13300, 2400, 1.5), (10200, 2800, -3.5)]


def capsules(x):
    spacing_hz, width_db = 400, 2
    high_pass = signal.butter(1, spacing_hz, "high", fs=SR, output="sos")
    side = gain_from_decibels(width_db) * signal.sosfilt(high_pass, x[0] - x[1])
    return peaks((x[0] + x[1] + side * [[1], [-1]]) / 2, MICROPHONE_COLOUR)


def scene():
    near = cut_ring() + table_slides() + fingering() + ticks_and_touches() + knocks() + rolls()
    near += set_down() + landings() + tipping() + bounce() + drop() + rebound()
    background = room_tone() + faint_moves() + sleeve() + band(thumps(), 35, 4000, order=1)
    return background + capsules(near + room(near.mean(axis=0)))


def gated_top(x, top_hz, gate_db, held_open):
    low = signal.sosfiltfilt(signal.cheby2(12, 40, top_hz, fs=SR, output="sos"), x)
    loud = uniform_filter1d((x - low).mean(axis=0) ** 2, size=512) > gain_from_decibels(2 * gate_db)
    gate = uniform_filter1d(np.maximum(loud, held_open) * 1., size=128)
    return low + gate * (x - low)


def top_cut(x):
    return signal.sosfilt(signal.butter(12, 16810, fs=SR, output="sos"), x)


def record(dry):
    t = np.arange(N) / SR
    edged = gated_top(dry, 16200, -43, False)
    edged = gated_top(edged, 15000, -46, t > SCENE_CHANGE[0])
    outside_s = np.maximum(SCENE_CHANGE[0] - t, t - SCENE_CHANGE[1])
    joined = edged * np.clip(outside_s / 0.0072, .03, 1)
    rounded = joined / (1.2 * joined ** 4 + 1) ** .25
    return top_cut(rounded)


dry = scene()
out = record(dry)
digitize_waveform(out)
```